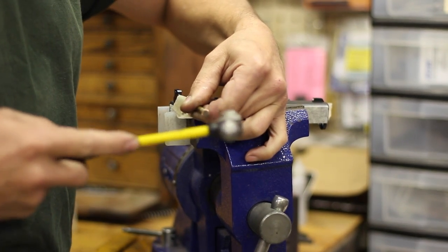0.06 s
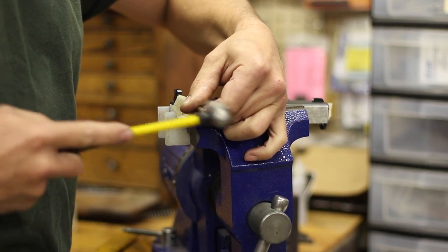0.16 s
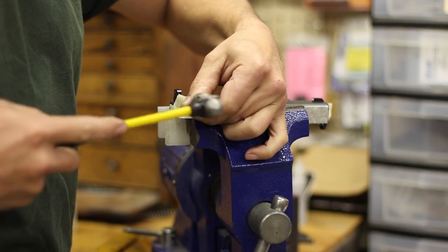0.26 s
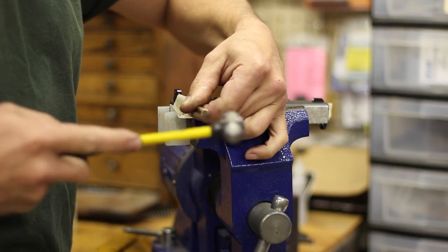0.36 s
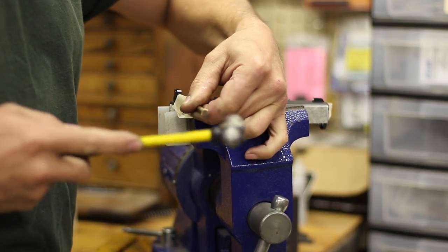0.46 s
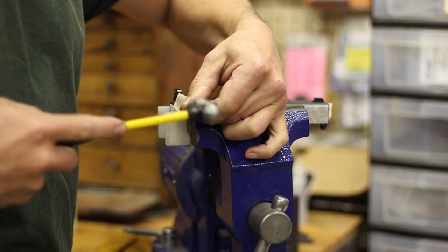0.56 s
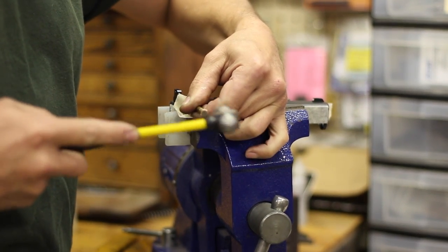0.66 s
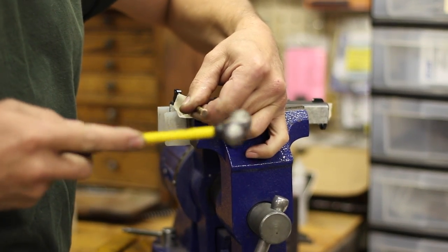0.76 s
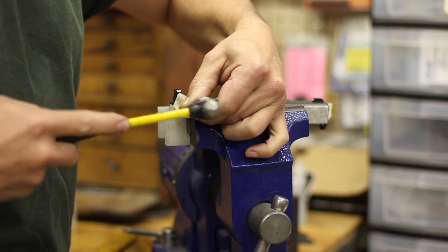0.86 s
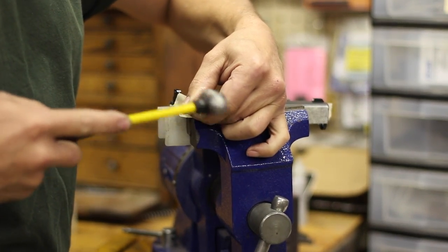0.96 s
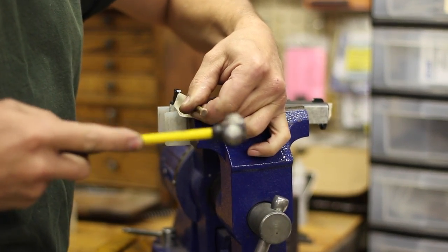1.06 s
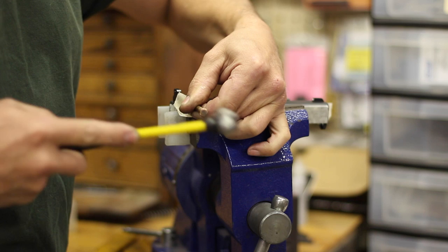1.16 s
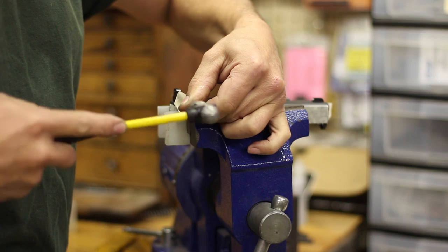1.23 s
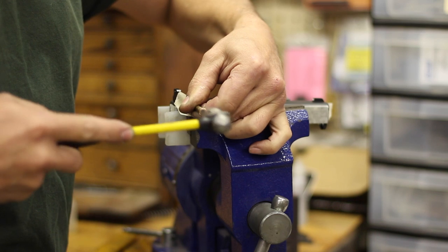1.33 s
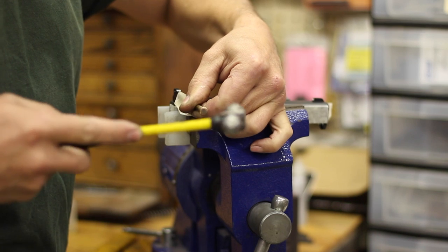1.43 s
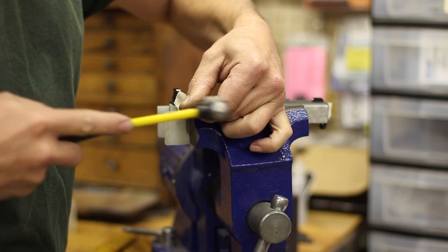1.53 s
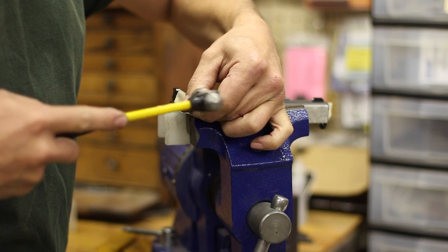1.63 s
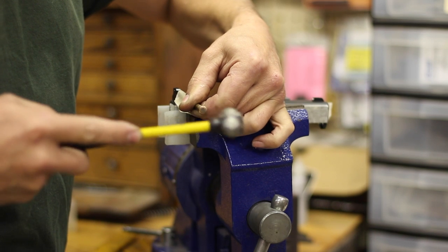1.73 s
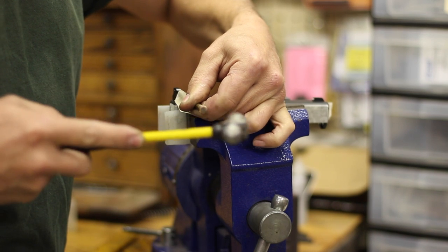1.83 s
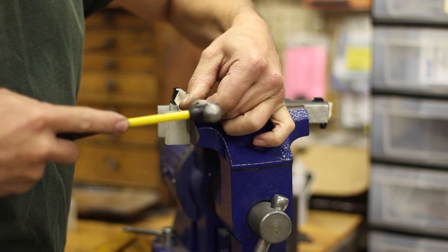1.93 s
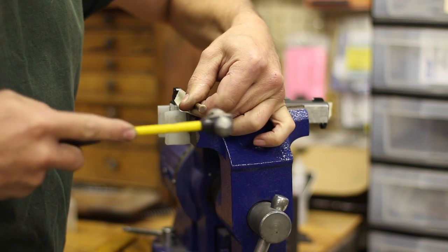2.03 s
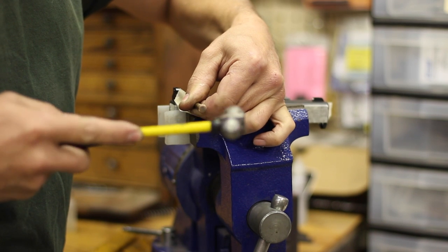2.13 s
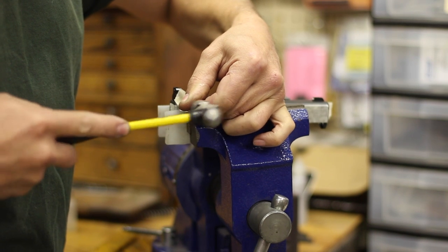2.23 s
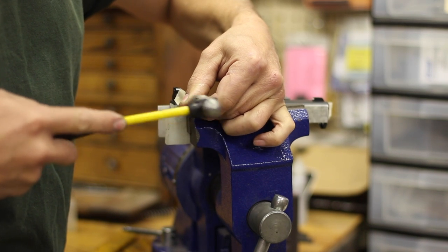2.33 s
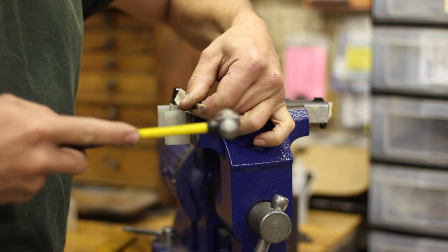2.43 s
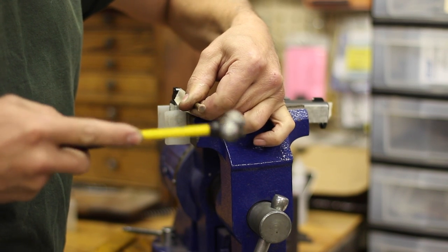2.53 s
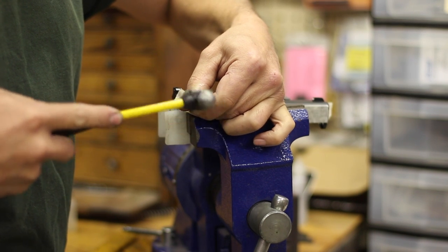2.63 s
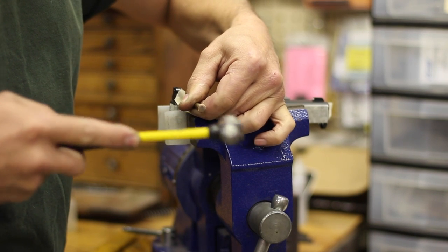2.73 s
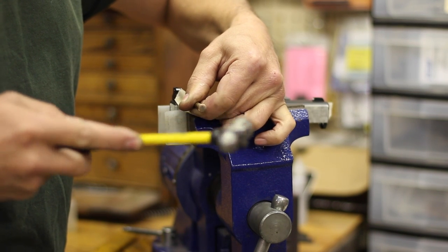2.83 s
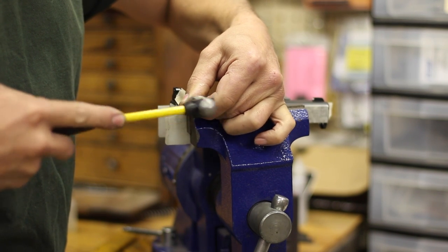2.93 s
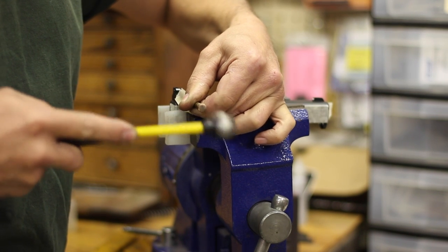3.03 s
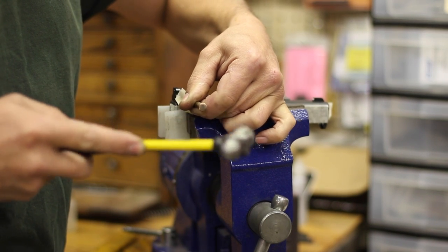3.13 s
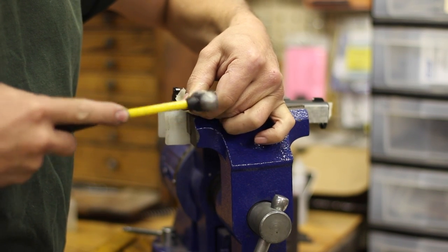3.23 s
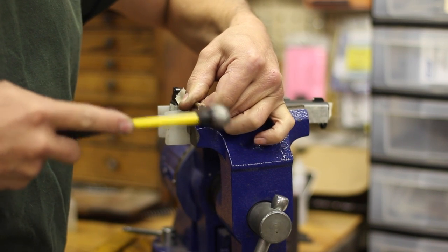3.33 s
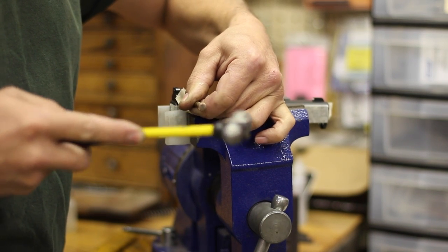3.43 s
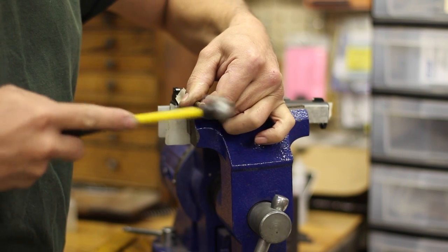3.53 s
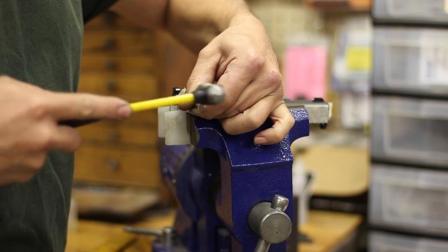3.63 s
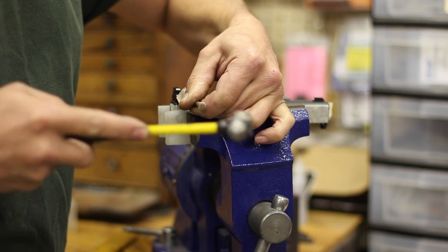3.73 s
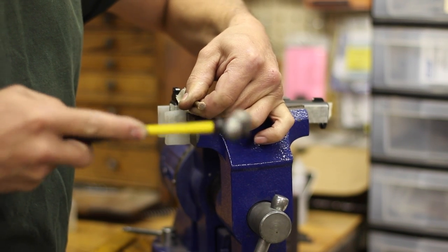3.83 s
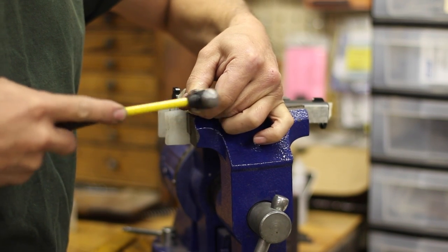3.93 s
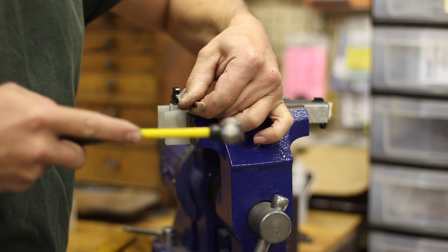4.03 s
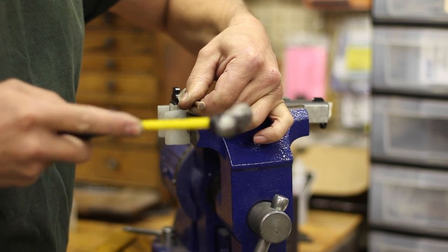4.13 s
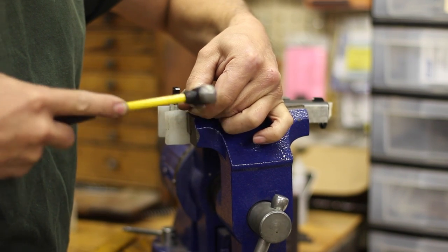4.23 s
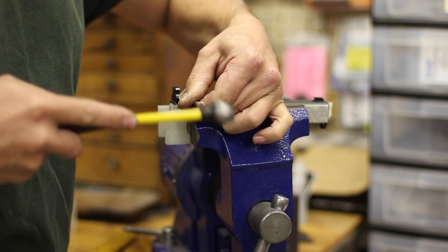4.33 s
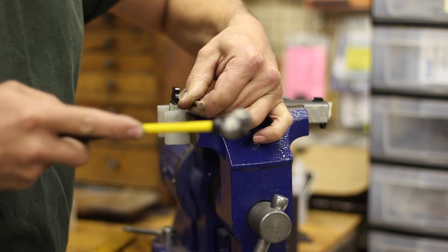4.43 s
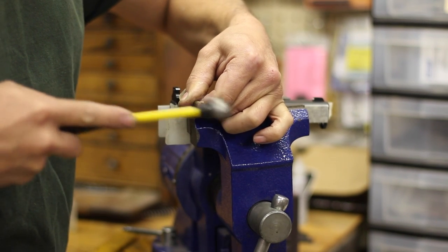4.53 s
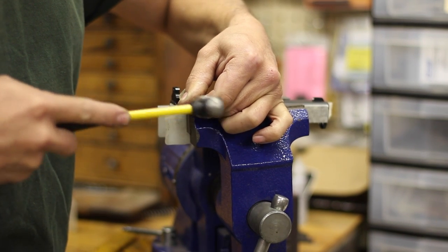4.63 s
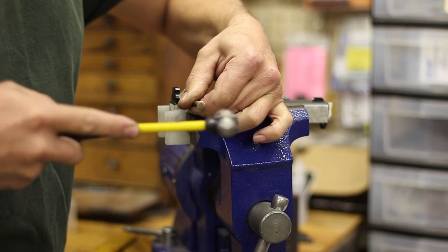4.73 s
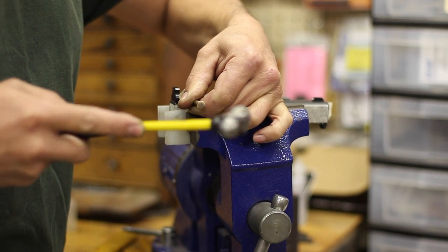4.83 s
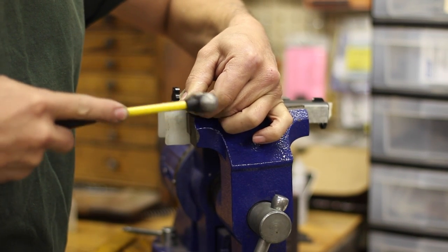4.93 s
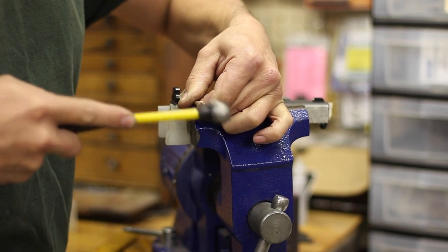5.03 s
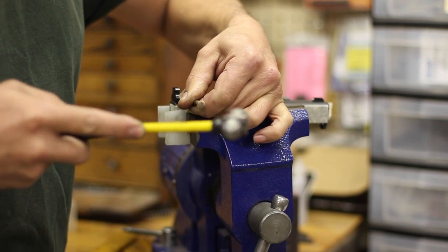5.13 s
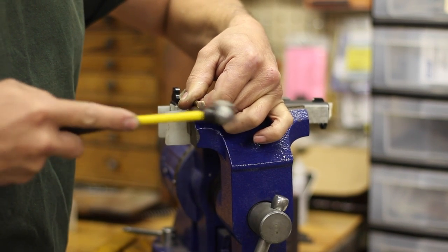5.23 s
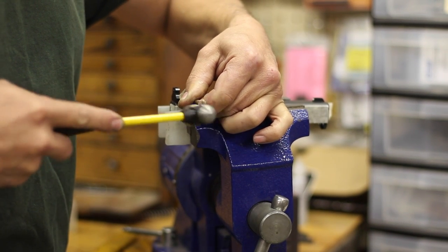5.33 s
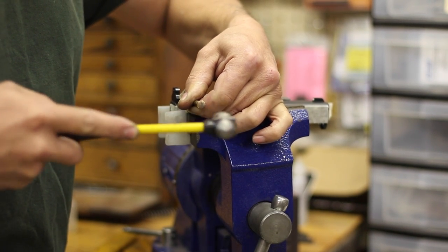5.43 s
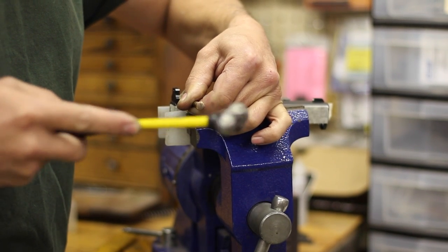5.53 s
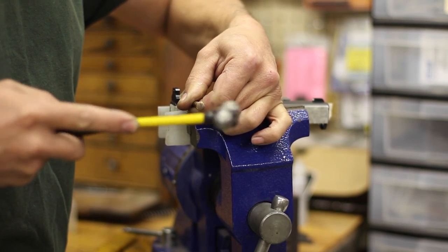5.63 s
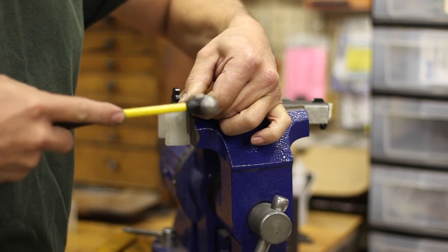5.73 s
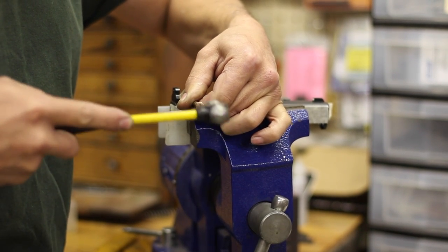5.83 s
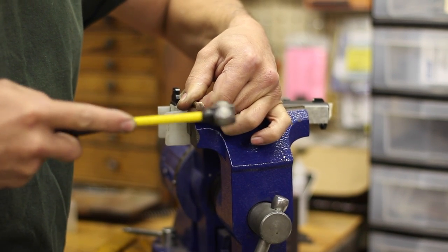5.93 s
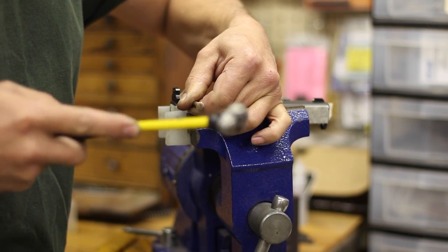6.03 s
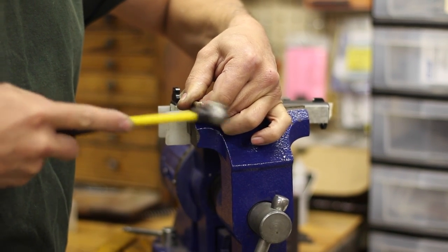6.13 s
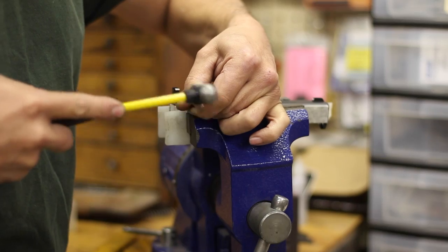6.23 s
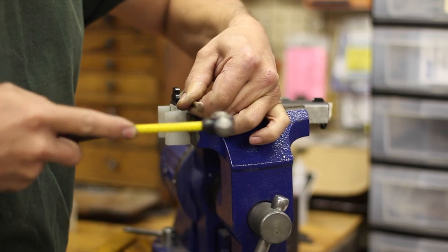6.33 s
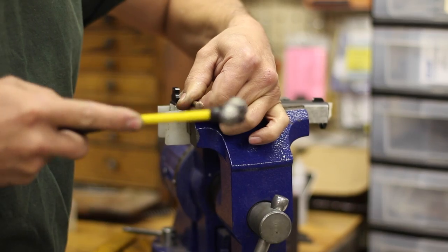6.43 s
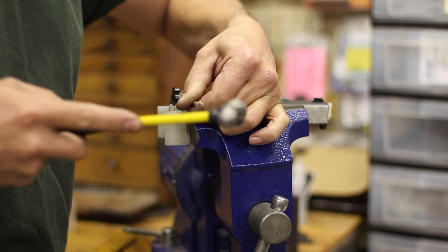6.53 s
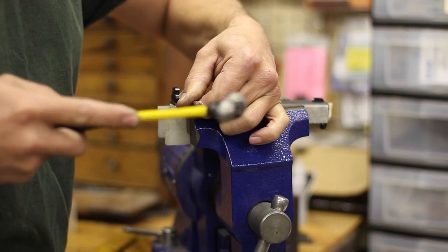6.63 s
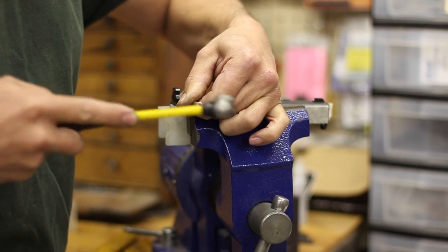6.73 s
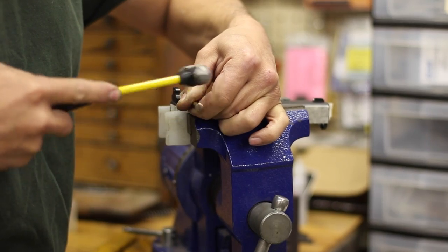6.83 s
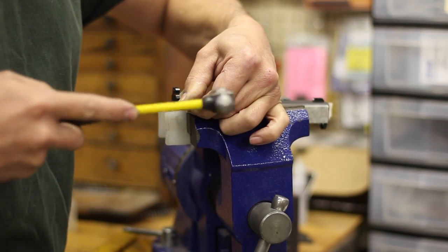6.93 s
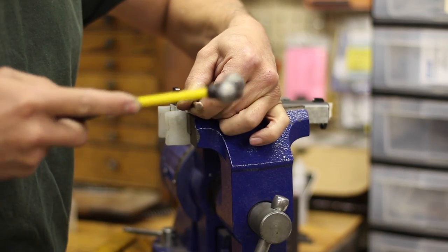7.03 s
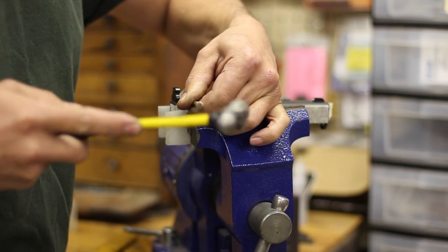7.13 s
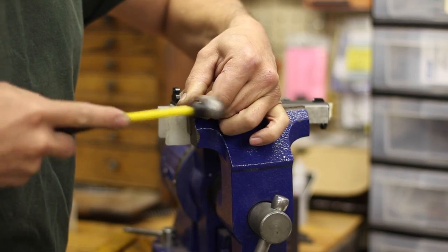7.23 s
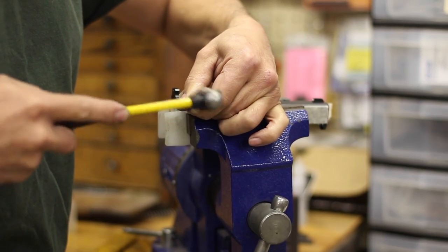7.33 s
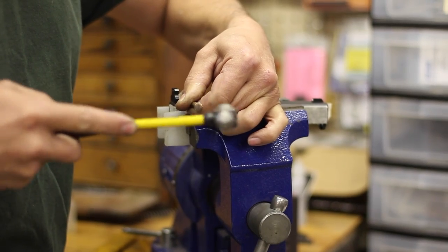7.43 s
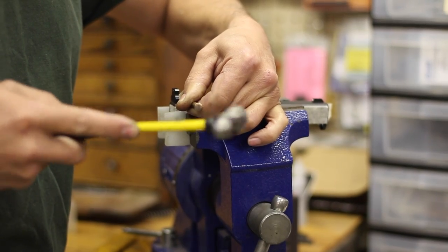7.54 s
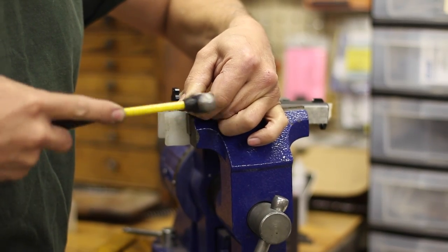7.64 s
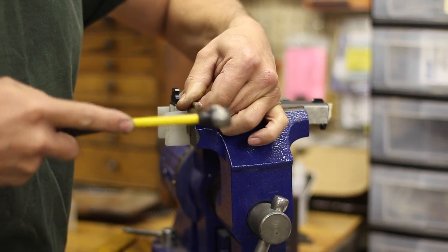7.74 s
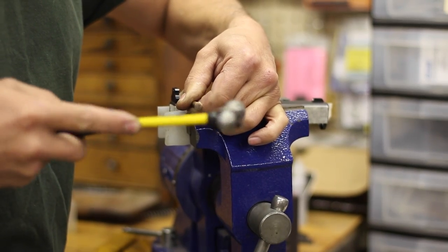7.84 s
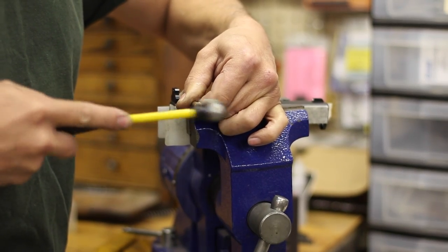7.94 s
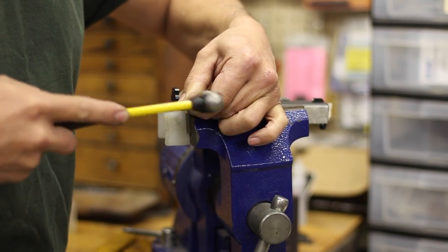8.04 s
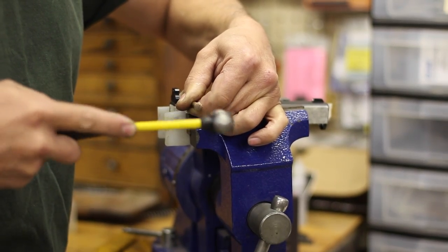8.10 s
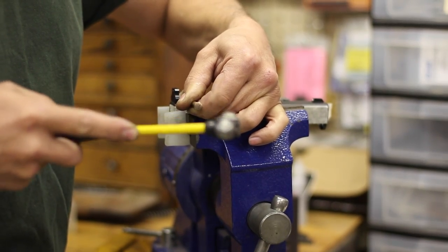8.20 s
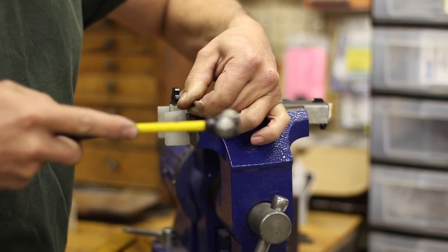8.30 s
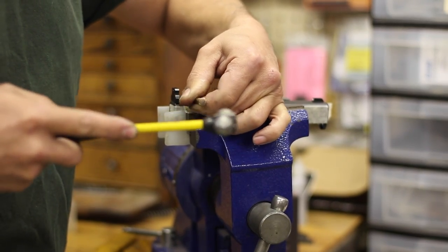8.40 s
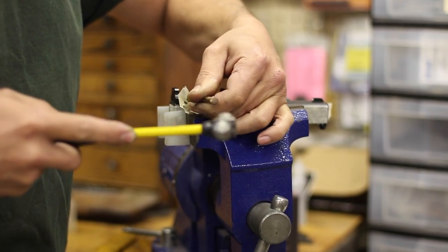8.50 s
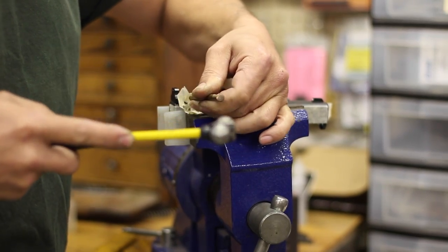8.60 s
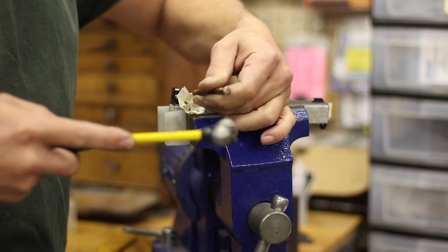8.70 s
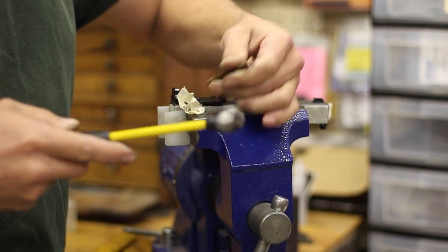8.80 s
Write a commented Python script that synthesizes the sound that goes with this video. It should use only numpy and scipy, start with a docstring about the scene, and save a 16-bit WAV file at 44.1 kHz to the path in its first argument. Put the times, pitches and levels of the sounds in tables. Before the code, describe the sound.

Quick, even hammer taps on a metal punch ring through a small workshop, ending with a light clink and faint finger rustle.

```python
"""A small hammer taps a steel punch against a part held in a bench vise; small workshop, near mono.
Each tap is heard with no sharp front: it swells for 40 ms and dies as a wash of the room,
coloured by vise and punch, whose ring climbs as it is driven in. Dry electrical ticks come 40 ms apart
between the early taps. Hands bump and rustle, the punch tip clinks, and lamps hum over a soft hiss."""
import sys
import numpy as np
from scipy import signal
from scipy.fft import rfft, irfft, next_fast_len
from scipy.io import wavfile
from scipy.ndimage import uniform_filter1d, map_coordinates

SR = 44100
rng = np.random.default_rng(int(sys.argv[2]) if len(sys.argv) > 2 else 0)


def output_pcm(signal):
    """Save a mono or channel-first signal as 16-bit PCM at the path in sys.argv[1].

    Samples are clipped to [-1, 1] before scaling.
    """
    pcm = np.clip(np.atleast_2d(signal).T, -1, 1) * 32767
    wavfile.write(sys.argv[1], SR, np.round(pcm).astype(np.int16))


N = 390971
SPAN = 2 * SR // 5  # samples in one event: 0.4 s
EVENT_T, EVENT_F = np.arange(SPAN) / SR, np.fft.rfftfreq(SPAN, 1 / SR)  # its axes: t/s, f/Hz


def amp(db):
    return 10 ** (np.asarray(db) / 20)

def unit(x):
    return x / np.sqrt(np.mean(x ** 2) + 1e-20)

def along(points, hz):
    """Read a curve of (f/Hz, value) points on a log frequency axis."""
    f, values = np.transpose(points)
    return np.interp(np.log(hz + 1), np.log(f + 1), values)

def filtered(x, response):
    """Apply a gain that depends on frequency."""
    size = next_fast_len(x.shape[-1] + 8192)
    return irfft(rfft(x, size) * response(np.fft.rfftfreq(size, 1 / SR)), size)[..., :x.shape[-1]]

def noise(spectrum, grain=1):
    """Scene-long noise of unit RMS, roughened by grain and shaped by (f/Hz, level/dB) points."""
    return unit(filtered(grain * rng.standard_normal(N), lambda hz: amp(along(spectrum, hz))))

def ripple(count, db, smooth):
    """Random gains that spread by db, smoothed over that many neighbours."""
    return amp(db * unit(uniform_filter1d(rng.standard_normal(count), size=smooth)))

def peak(hz, width_hz):
    """Power spectrum of one resonance, 1 at its centre."""
    return 1 / (1 + (2 * (EVENT_F - hz) / width_hz) ** 2)

def seated(firm, loose, tight):
    """Blend from the value for a loose part (firm = 0) to that for a firmly seated one (1)."""
    return loose + firm * (tight - loose)

def add(track, start_s, sound):
    """Mix a sound in, dropping what falls outside the track."""
    start = round(start_s * SR)
    sound = sound[max(-start, 0):len(track) - start]
    track[max(start, 0):][:len(sound)] += sound

def workshop():
    """The room's answer to a click: each frequency dies at its own speed."""
    # reverberation time: f/Hz, t60/s
    decay = [(100, 0.85), (400, 0.29), (900, 0.56), (1500, 0.51), (2500, 0.45), (4000, 0.35), (6000, 0.31),
             (8000, 0.21), (14000, 0.16)]
    hz, t, bands = signal.stft(rng.standard_normal(SPAN), SR, nperseg=256)
    return signal.istft(bands * amp(-60 * t / along(decay, hz)[:, None]), SR, nperseg=256)[1][:SPAN]

def vise_body(firm):
    """Spectrum of blow and vise; a loose part weakens the vise modes and adds one broad clank."""
    # spectrum of the blow: f/Hz, level/dB
    blow = [(60, -45), (90, -12), (120, 4.5), (200, 0.5), (500, 0), (800, -13), (2500, 1.5), (4800, 0),
            (5800, 7.5), (8000, 6), (11000, 5), (16000, -5)]
    # vise modes: f/Hz, width/Hz, level/dB
    modes = [(122, 3.3, -8.5), (315, 22, 8.5), (604.5, 26, 3), (861.4, 26, 10), (951, 19.4, 8),
             (969, 88, -0.5), (1180, 82, 4.5), (1405, 56, 5.5), (1770, 73, -2.5), (1946, 28, 6.5),
             (2418, 77, 6), (2830, 21, -18), (3440, 124, 5.5)]
    vise = amp(seated(firm, -2.5, 0)) ** 2 * sum(amp(db) ** 2 * peak(hz, width) for hz, width, db in modes)
    clank = seated(firm, 0.79, 0) * amp(3.5) ** 2 * peak(944 * rng.normal(1, 0.089), width_hz=296)
    body = np.sqrt(amp(along(blow, EVENT_F)) ** 2 + vise + clank)
    return body * ripple(len(body), db=1.6, smooth=120)  # no two blows stir the same small modes

def tap_colour(firm, crack_db, thud_db, punch_db):
    """Gain by frequency for one blow: seating, a bright crack, the low bench and the punch shank."""
    # what reaches bench, vise, jaws, part and shank: f/Hz, loose level/dB, firm level/dB
    seat = [(376, -8.5, -9.5), (605, -8, 2), (770, -5.5, 6), (1090, -6.5, 7.5), (1110, -8.5, 4.5),
            (1430, -4, 5), (1640, 1.3, 1.5), (2120, -.4, 2.5), (2400, 0.9, -0.8), (3500, 1.2, 0.8),
            (3960, 3, 1.7), (4840, -5, -2.1), (5740, -13, -16), (6500, -19.5, -16.5), (9450, -14, -14)]
    seating = along([(hz, seated(firm, loose, tight)) for hz, loose, tight in seat], EVENT_F)
    crack = crack_db * peak(6060, width_hz=1360)
    bench = thud_db / (1 + (EVENT_F / 605) ** 6)
    shank = 0.083 * punch_db * peak(4640, width_hz=470)
    return amp(seating + crack + bench + shank)

def steel_rings(room, firm, part_hz, part_db, punch_hz, punch_db, head_db):
    """Part, punch and hammer head ring in narrow bands that die more slowly than the room."""
    # upper mode of the punch: f/Hz, width/Hz, loose level/dB, firm level/dB, slowing of decay/(dB/s)
    punch_upper = [(12430, 220, -9, -6, 84)]
    # hammer head modes: same columns
    head = [(4160, 51, -8, 8.5, 18), (7490, 410, 0.5, -19, 73), (8170, 60, -1, 4.5, 34),
            (11400, 78, 0, -22, 45), (13030, 180, 2.5, -4.5, 40)]
    part = [(part_hz, seated(firm, 180, 187), 0, 0, 70)]
    punch = [(punch_hz, seated(firm, 480, 200), 0, 0, 40), *punch_upper]
    sound = np.zeros(SPAN)
    for modes, db in ((part, part_db), (punch, punch_db), (head, head_db)):
        for hz, width, loose, tight, linger in modes:
            linger_db = linger * (np.minimum(EVENT_T, .25) - .09)
            ring = irfft(room * peak(hz, width), SPAN)
            sound += amp(db + seated(firm, loose, tight) + linger_db) * ring
    return sound

def bench_jolt(thud_db, delay_s=0.078, width_s=0.0086):
    """The bench jolts once after each blow: a short, low knock."""
    # bench tones: f/Hz, level/dB relative to the thud
    tones = [(135, -23), (350, -22.5)]
    knock = sum(amp(db) * np.sin(2 * np.pi * (hz * rng.normal(1, .05) * EVENT_T + rng.random()))
                for hz, db in tones)
    return knock * amp(thud_db + rng.normal(0, 1.3)) * np.exp(-((EVENT_T - delay_s) / width_s) ** 2)

def hammer_taps():
    """Hammer and microphone hardly move, so all taps share most of one room answer."""
    # blows: t/s, level/dB, firmness of the part/0-1, punch f/Hz, punch ring/dB, head ring/dB,
    # crack/dB, bench thud/dB, part f/Hz, part ring/dB
    blows = [(-0.052, -16, 0, 4330, 13.5, 4.5, -4, 4.5, 2270, -19),
             (0.2937, -14.5, 0.22, 4290, 12, 2, 1, 3, 2330, -24),
             (0.6273, -16, 0.27, 4440, 14.5, 7.5, 2, -0.7, 2320, -8),
             (0.9636, -14, 0.07, 4570, 8, .3, 1.5, -0.3, 2280, -25),
             (1.3046, -15.5, 0, 4790, 10, 3, .3, -3.5, 1900, 2.5),
             (1.6588, -14, .01, 4600, 7.5, 0, 7.5, -4.5, 2280, 1),
             (2.0018, -16.5, 0.56, 4740, 10, 4, 14, 0.2, 2470, -4),
             (2.349, -15, 0.46, 4830, 10, 9.5, 5, 2.2, 1780, 2.5),
             (2.6891, -15, 0.79, 4900, 12, 0, 3, -1.2, 1570, -7),
             (3.013, -15, 0.92, 4980, 13, -1, 1.5, -1, 1550, -3),
             (3.3366, -15.5, 0.93, 5020, 13, 1, 2, -0.3, 1580, -1.2),
             (3.66, -15, 0.91, 5070, 10.5, 2, 1, 2, 1530, -8),
             (3.985, -15, 1, 5120, 10, 4, 2.2, 0.5, 1620, 2),
             (4.3137, -14, 0.88, 5050, 6.5, 1, -1, .3, 1600, -5),
             (4.6616, -14.5, 1, 5130, 3.5, -1, 1, .3, 1530, -2),
             (5.0085, -14, 1, 5270, -12, -9, 3, 0, 1570, 6),
             (5.3691, -12.5, 0.86, 5100, -8, -2, 2.5, 0.8, 1600, 4.5),
             (5.7934, -14, .99, 5130, -16, 2, -2.2, 0.2, 1620, 6.5),
             (6.2631, -14.5, 1, 5240, -19, -2, 2, -1.5, 1570, 7.5),
             (6.8772, -13.5, 0.99, 5150, 1, 3.5, -4, -2.5, 1560, 4),
             (7.3612, -13.5, 1, 5140, 0, -2, -3, -1.5, 1556, 3),
             (7.7162, -13.5, 0.98, 5160, -6, 5.5, -1.5, -0.7, 1570, 2.5),
             (8.0635, -14, 0.95, 5240, -9, 3.5, 0.5, 3.5, 1630, 6)]
    # gain laid over the room's decay: t/s after the blow, level/dB
    swell_curve = [(0, -23.5), (.004, -18), (.015, -9.5), (.035, 0), (.06, 2), (.12, 4), (.16, 0),
                   (.2, -10), (.26, -19), (.45, -21)]
    swell = amp(np.interp(EVENT_T, *np.transpose(swell_curve)))
    swell *= np.clip((.37 - EVENT_T) / .07, 0, 1)  # fade to silence
    track, walls = np.zeros(N), workshop()
    for start, db, firm, punch_hz, punch_db, head_db, crack_db, thud_db, part_hz, part_db in blows:
        room = rfft(walls + 0.73 * workshop())  # the hands shift between taps
        wash = irfft(room * vise_body(firm) * tap_colour(firm, crack_db, thud_db, punch_db), SPAN)
        rings = steel_rings(room, firm, part_hz, part_db, punch_hz, punch_db, head_db)
        add(track, start, amp(db) * (swell * (wash + rings) + bench_jolt(thud_db)))
    return track

def room_tone(air_db=-55):
    """Softly swaying room air, and lamp ballasts humming on slightly unsteady mains overtones."""
    # spectrum of the air: f/Hz, relative level/dB
    air = [(25, -36), (45, -26), (62, -17), (90, -5), (120, -4), (250, 2.5), (500, 0), (1000, -5.5),
           (2500, -9.5), (4000, -11), (8000, -16.5), (13000, -21), (16000, -28)]
    # lamp hum: f/Hz, level/dB
    ballasts = [(120, -73), (240, -72.5), (360, -62), (598, -75)]
    t = np.arange(N) / SR
    drift = lambda rate_hz: map_coordinates(rng.standard_normal(int(N * rate_hz / SR) + 4), [t * rate_hz])
    hum = sum(amp(db + 2 * drift(17)) * np.sin(2 * np.pi * hz * t + 1.2 * drift(3.5))
              for hz, db in ballasts)
    return amp(air_db + drift(2.4)) * noise(air) + hum

def side_hiss(db=-68):
    """Faint hiss that differs between left and right."""
    # spectrum of the hiss: f/Hz, relative level/dB
    spectrum = [(40, -20), (250, -5), (1000, -12.5), (4000, -10.5), (16000, -14)]
    return amp(db) * noise(spectrum)

def electrical_ticks(gap_s=.04, tick_hz=5000):
    """Each tick is one rounded spike, about a cycle long, with an overshoot behind it and no room."""
    # runs of ticks: t/s of the first, level/dB of each in turn
    runs = [(0.1129, [-22, -20, -22, -32, -24]), (0.3928, [-37, -27]),
            (0.7525, [-18, -22, -17, -22, -32, -27]), (1.0729, [-20, -26, -18, -22, -20, -24]),
            (1.393, [-18, -21]), (1.793, [-23, -21.5, -19, -26, -23.5]), (2.113, [-25, -21, -17, -20.5]),
            (2.4328, [-30, -19, -16.5, -19, -19.5, -30, -31]), (2.9928, [-29])]
    lead = 40  # samples before the centre of the spike
    track, t = np.zeros(N), (np.arange(5 * lead) - lead) / SR
    spike = np.cos(2 * np.pi * tick_hz * t + 0.68) * np.exp(-(t / .00009) ** 2)
    overshoot = .3 * (t > 0) * np.sin(2 * np.pi * tick_hz * t) * amp(-60 * np.abs(t) / .002)
    push = 0.25 * np.exp(-(t / .0001) ** 2)
    for first, levels in runs:
        for k, db in enumerate(levels):
            add(track, first + k * gap_s - lead / SR, amp(db) * (spike - overshoot + push))
    return track

def hand_bumps():
    """Hand and cloth bump dully, each time as one quickly damped tone."""
    # bumps: t/s, level/dB, f/Hz, t60/s
    bumps = [(.258, -28, 690, 0.0068), (1.254, -30, 400, 0.016), (3.0085, -31, 1200, 0.0071),
             (6.413, -22.5, 260, 0.032), (6.424, -24, 173, 0.037), (6.504, -37, 610, 0.081),
             (6.531, -33, 223, 0.058)]
    track, t = np.zeros(N), EVENT_T
    attack = 1 - np.exp(-t / 0.00088)
    for start, db, hz, t60 in bumps:
        add(track, start, amp(db - 60 * t / t60) * np.sin(2 * np.pi * hz * t) * attack)
    return track

def tip_clinks():
    """The punch tip touches steel and rings briefly, with a faint echo off the walls."""
    # touches: t/s, level/dB, gain above 4 kHz/dB
    touches = [(4.597, -29, -33), (8.452, -48, -25), (8.5554, -26, -7.5), (8.5909, -43, -22)]
    # modes of the tip: f/Hz, level/dB, t60/s
    modes = [(2000, -14, 0.0046), (3340, -2.5, 0.0052), (4600, 6, 0.0082), (6600, 7, 0.0054),
             (10100, 10.5, 0.0058), (10400, -2, 0.0055), (11200, -7, .006)]
    track, t = np.zeros(N), EVENT_T
    for start, db, treble_db in touches:
        ring = np.zeros(SPAN)
        for hz, mode_db, t60 in modes:
            struck_db = mode_db + treble_db * (hz > 4000) + rng.normal(0, 3)
            ring += amp(struck_db - 60 * t / t60) * np.sin(2 * np.pi * hz * t)
        ring *= 1 - np.exp(-t / 0.00035)
        echo = signal.fftconvolve(ring[:1000], workshop() * amp(-60 * t / 0.11))[:SPAN]
        add(track, start, amp(db) * (ring + amp(-30) * echo))
    return track

def finger_rustle(edge_s=0.011, fade_db=8):
    """Skin and sleeve brush over steel in uneven grains; each stroke sets in fast and fades."""
    # fingers shifting on the punch: t/s, length/s, level/dB
    strokes = [(7.05, .3, -54), (8.27, 0.2, -54), (8.442, 0.12, -52.5), (8.558, 0.32, -57)]
    # spectrum of skin on steel: f/Hz, relative level/dB
    skin = [(300, -36), (700, 5), (1500, 1), (2500, 4), (3800, 3.5), (5500, -34), (9000, -35)]
    envelope, t = np.zeros(N), np.arange(N) / SR
    for start, length, db in strokes:
        gate = np.clip(np.minimum(t - start, start + length - t) / edge_s, 0, 1)
        envelope += amp(db - fade_db * np.abs(t - start) / length) * gate
    return envelope * noise(skin, grain=ripple(N, db=2.2, smooth=300))

def scene():
    """The bench sits in the centre; only a faint hiss and a trace of the ticks differ left to right."""
    ticks = electrical_ticks()
    mid = hammer_taps() + room_tone() + ticks + hand_bumps() + tip_clinks() + finger_rustle()
    side = side_hiss() + 0.049 * ticks
    return np.array([mid + side, mid - side])

def record(dry, low_cut_hz=50, top_hz=16300):
    """The microphone chain: a steep bass roll-off, and nothing above the band limit."""
    return filtered(dry, lambda hz: (hz < top_hz) / (1 + (low_cut_hz / (hz + 1)) ** 4))


dry = scene()
out = record(dry)
output_pcm(out)
```